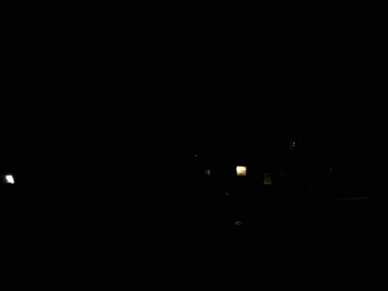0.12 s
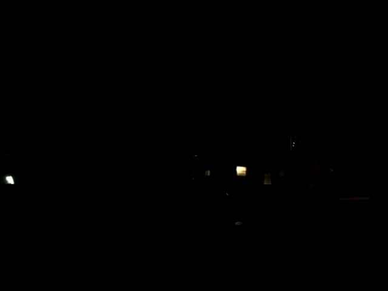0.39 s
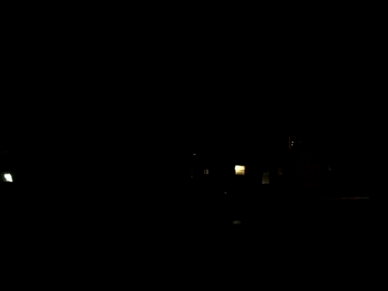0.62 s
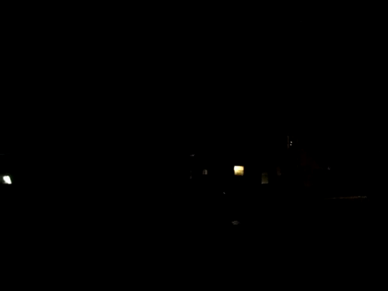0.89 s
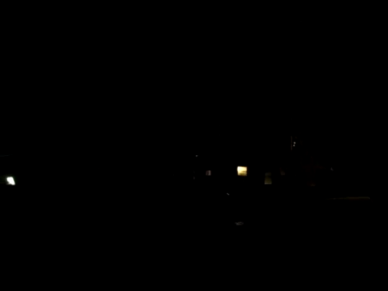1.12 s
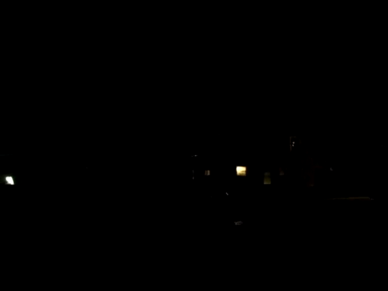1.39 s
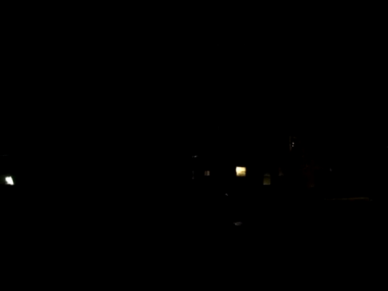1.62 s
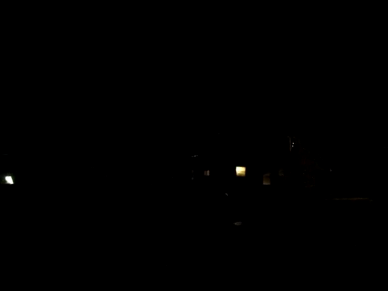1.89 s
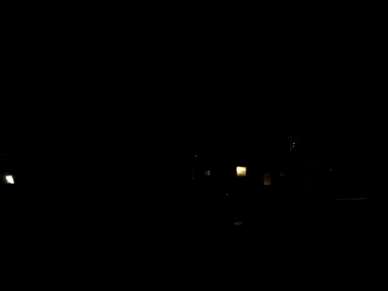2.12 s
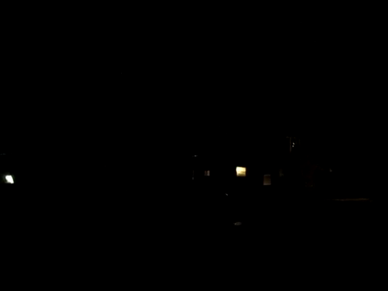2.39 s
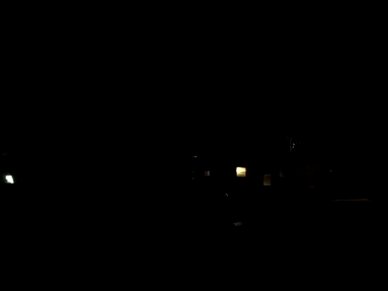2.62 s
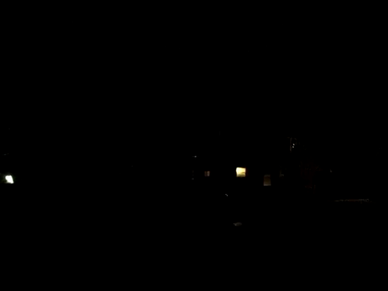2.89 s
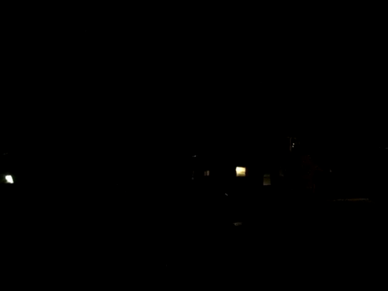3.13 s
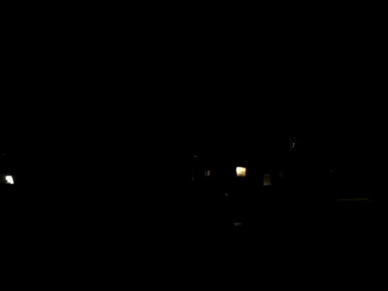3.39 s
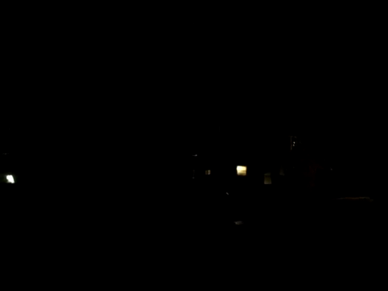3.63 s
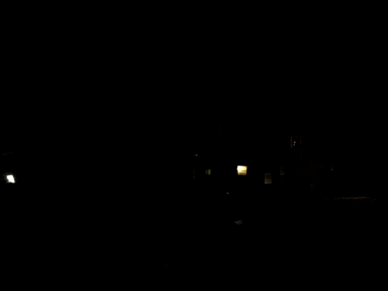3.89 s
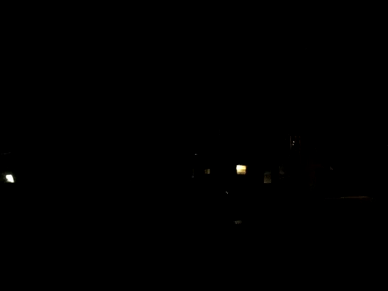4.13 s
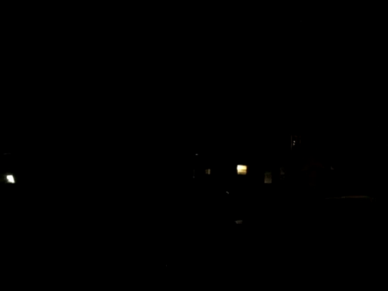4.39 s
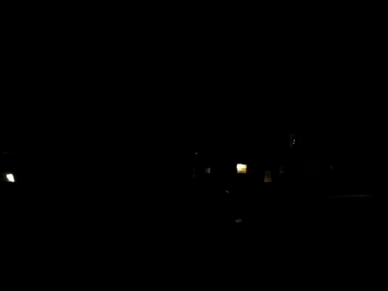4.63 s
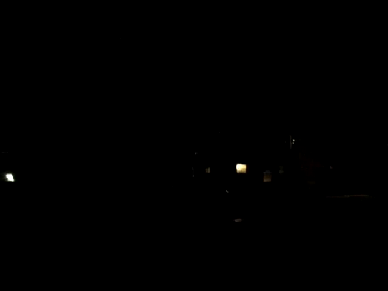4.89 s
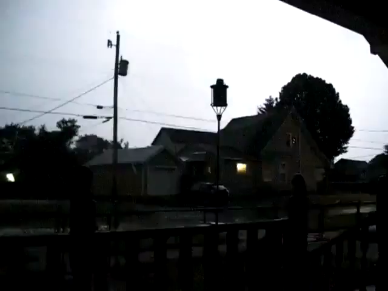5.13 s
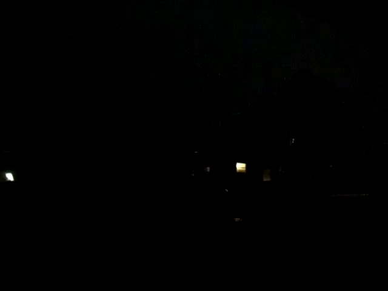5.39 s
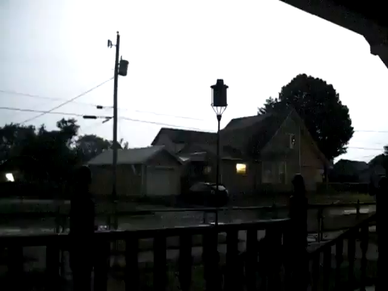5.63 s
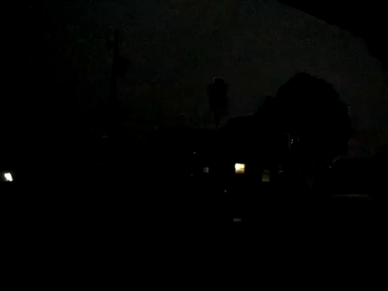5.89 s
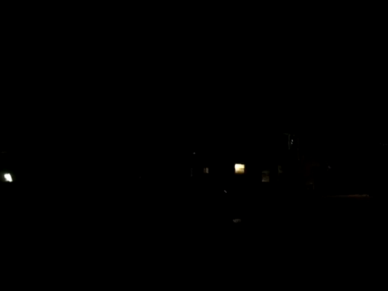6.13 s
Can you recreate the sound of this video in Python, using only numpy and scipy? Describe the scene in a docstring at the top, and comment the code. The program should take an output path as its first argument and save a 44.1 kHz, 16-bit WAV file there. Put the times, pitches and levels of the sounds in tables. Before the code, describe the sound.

From a porch at night, one microphone picks up soft rain hiss, scattered drop splashes and thin wavering tones. A distant rumble gives way to dull, knocking thunder, peal upon peal, growing to a massive low crash a little past halfway. The automatic gain sinks under the blow, making the rain fade and creep back, while the thunder decays unevenly through lesser rumbles to the end.

```python
"""A porch at night: thunder rolls over steady rain on the street.
Crowds of low shocks, made from filtered impulses and noise, swell in peals; single booms are short sine bursts.
Rain is patchy coloured noise with a patter of impulses; near drops splash as short noise sprays.
A few faint whines, wavering sines, hang in the rain.
The loudest booms pull the recorder's gain down, so rain and whines sink and creep back."""
import sys
import numpy as np
from scipy import signal
from scipy.fft import rfft, irfft, next_fast_len
from scipy.io import wavfile
from scipy.ndimage import uniform_filter1d, minimum_filter1d, map_coordinates

SR = 44100
rng = np.random.default_rng(int(sys.argv[2]) if len(sys.argv) > 2 else 0)


def transcribe(u):
    """Save the signal u as a 16-bit wav file named by the first command-line argument.

    u: samples, shape (n,) or (channels, n), limited to [-1, 1]; the rate is SR.
    q: integer samples, one column per channel.
    """
    v = np.clip(np.atleast_2d(u).T, -1, 1)
    q = np.round(v * 32767).astype(np.int16)
    wavfile.write(sys.argv[1], SR, q)


def voltage_ratio(level):
    """Linear amplitude factor for a level in decibels (scalar or array-like)."""
    return 10 ** (np.asarray(level, float) / 20)


N = 276507  # samples

# Rain level before gain control. Each row: time in seconds, level in dB.
RAIN_LEVEL = [(0, -44), (2.6, -44), (5.2, -44), (6.27, -42.5)]
# Rain spectrum. Each row: frequency in Hz, relative density in dB.
RAIN_SPECTRUM = [(180, -38), (300, -13.5), (500, -1.5), (770, -5.5), (1200, -7), (1800, -11), (2600, -10),
                 (3600, -14), (5000, -16), (6500, -20.5), (8500, -26.5), (12000, -33), (15000, -66)]
# Whines. Each row: frequency in Hz, base level in dB against the rain level, wavering in dB, phase drift in rad.
WHINES = [(1533, -9, 1, .3), (2888, -12.5, 3, .5), (2830, -19, 2, .5), (7760, -33, 1, .3)]
# Whine swell. Each row: time in seconds, change of the lowest whine in dB, change of the higher ones in dB.
WHINE_SWELL = [(0, 2.5, 5), (1.3, 3, -4), (2.4, 2, -6), (3.6, -1, -9), (4.6, -0.5, -0.5), (5.8, -1.5, 1),
               (6.27, -3, 6)]
# Near splashes. Each row: start in seconds, nominal peak in dB, centre in Hz, nominal length in seconds.
SPLASHES = [(0.255, -50.5, 6950, .012), (.53, -40, 4500, .2), (1.213, -42, 5000, .05),
            (1.478, -32.5, 3480, 0.024), (1.615, -44.5, 6500, 0.023), (1.914, -37, 3500, 0.015),
            (2.297, -35.5, 10000, 0.0033), (2.303, -45, 10100, .025), (2.67, -46.5, 6000, .04),
            (3.577, -40.5, 4480, 0.018), (4.53, -44, 10000, .01), (5.509, -46.5, 7000, .01),
            (5.889, -44, 5000, .03), (6.171, -43, 5000, 0.007), (6.204, -41, 10000, .012)]
# Peals. Each row: time of the top in seconds, body level in dB, rise in seconds per 10 dB,
# fall in seconds per 10 dB, depth in dB (added to the deep range, taken from the bright one).
PEALS = [(.45, -39, 0.66, 0.78, -6.5), (.82, -37.5, .06, 0.087, -12), (1.38, -25.5, 0.13, 0.19, -1.5),
         (1.53, -22, 0.11, 0.14, 3), (1.69, -23.5, 0.048, 0.11, 0.5), (1.81, -18, 0.035, .25, -3.5),
         (2.03, -20.5, 0.036, 0.24, 0), (2.33, -21, 0.092, 0.72, 1), (2.711, -16.5, .12, 0.15, -0.5),
         (3.1, -19, 0.38, 0.34, -2.5), (3.48, -16, 0.22, 0.14, 0), (3.62, -11, 0.074, 0.22, 2),
         (3.83, -10, .12, 0.27, 3.5), (4.25, -19.5, 0.24, 0.37, 1), (4.54, -17.5, 0.21, 0.32, 3),
         (5.02, -21.5, 0.49, 0.59, 3.5), (5.48, -19, 0.25, 0.26, 0.5), (5.72, -22.5, 0.21, 0.59, 0),
         (6.25, -26, 0.26, .3, -1)]
# Thunder spectrum. Each row: frequency in Hz, relative density in dB.
THUNDER_SPECTRUM = [(15, -53), (24, -28.5), (33, -20), (43, -25.5), (50, -14.5), (62, -6), (84, -2.5),
                    (123, -1), (225, -2.5), (292, -8), (361, -14), (462, -14.5), (707, -23), (850, -30),
                    (1100, -36), (1500, -72)]
# Single booms. Each row: time of the top in seconds, peak before gain control in dB, pitch in Hz,
# nominal width in seconds.
BOOMS = [(1.354, -13.5, 205, 0.024), (1.547, -13.5, 192, 0.042), (1.685, -9.5, 211, 0.018),
         (1.83, -11, 188, 0.034), (1.857, -11, 186, 0.043), (2.013, -8, 188, 0.036),
         (2.315, -7.5, 133, 0.024), (2.708, -9, 149, .015), (2.719, -3, 185, 0.018),
         (2.821, -11.5, 193, .017), (3.006, -11, 111, 0.012), (3.077, -11.5, 150, .025),
         (3.222, -9.5, 205, .018), (3.343, -9, 212, 0.031), (3.465, -10.5, 138, 0.023),
         (3.498, -3.5, 220, 0.014), (3.584, -5.5, 130, .017), (3.632, -1, 202, .015),
         (3.66, -1, 237, 0.044), (3.783, 6.5, 125.5, 0.021), (3.82, 1.3, 83, 0.025), (3.889, 2.5, 88, .028),
         (3.995, -4, 140, 0.017), (4.256, -10.5, 100, 0.028), (4.544, -9.5, 178, 0.024),
         (5.025, -14, 111, 0.016), (5.464, -11, 156, 0.027), (5.554, -14, 190, 0.0286),
         (5.634, -13.5, 166, 0.022), (5.703, -14.5, 97, .025)]

MURMUR_DB = -41.5  # far thunder that never stops
DEEP_DB, BRIGHT_DB = -7.5, -8.5  # against the body range
HOLD_DB, LISTEN_S, RETURN_DB_PER_S = -5, 0.012, 4.5  # gain control


def unit(x):
    """Scales x to an rms of 1."""
    return x / np.sqrt(np.mean(x ** 2) + 1e-20)


def curves(rows):
    """One value per sample for each column after the time."""
    s, *columns = np.transpose(rows)
    return [np.interp(np.arange(N) / SR, s, column) for column in columns]


def wobble(knots_per_s):
    """A smooth random curve."""
    knots = rng.standard_normal(int(N * knots_per_s / SR) + 4)
    return map_coordinates(knots, [np.arange(N) * knots_per_s / SR])


def coloured(x, spectrum, share=lambda hz: 1):
    """x through a (Hz, dB) spectrum, or through the part of it that share keeps."""
    size = next_fast_len(len(x) + 8192)
    hz = np.fft.rfftfreq(size, 1 / SR) + 1e-3
    point_hz, point_db = np.transpose(spectrum)
    gain_db = np.interp(np.log(hz), np.log(point_hz), point_db)
    return irfft(rfft(x, size) * voltage_ratio(gain_db) * share(hz), size)[:len(x)]


def pelting(per_second, spread_db):
    """Impulses at random moments, either sign, some larger than the rest."""
    moment, sign, rank = rng.random((int(per_second * N / SR), 3)).T
    size = np.sign(sign - 0.5) * voltage_ratio(-spread_db * np.log(1.003 - rank))
    return np.bincount((moment * N).astype(int), size, N)


def rain_hiss():
    """Far drops merge into a patchy hiss; nearer ones patter on top."""
    z = signal.stft(rng.standard_normal(N), nperseg=512)[2]
    patches = uniform_filter1d(rng.standard_normal(z.shape), 30, axis=0)
    patches = uniform_filter1d(patches, 8, axis=1)
    far = signal.istft(z * voltage_ratio(0.58 * unit(patches)), nperseg=512)[1][:N]
    near = unit(pelting(per_second=500, spread_db=3.0))
    drops = unit(far) + voltage_ratio(-12.5) * near
    return unit(coloured(drops, RAIN_SPECTRUM)) * voltage_ratio(0.58 * wobble(9))


def whines():
    """Sines that waver in level and drift in phase."""
    t = np.arange(N) / SR
    low_db, high_db = curves(WHINE_SWELL)
    out = np.zeros(N)
    for hz, db, waver_db, drift_rad in WHINES:
        swell_db = low_db if hz < 2000 else high_db
        level_db = db + swell_db + waver_db * wobble(5)
        out += voltage_ratio(level_db) * np.sin(2 * np.pi * hz * t + drift_rad * wobble(8))
    return out


def rain():
    """Hiss and the whines that hang in it follow one level curve."""
    level_db, = curves(RAIN_LEVEL)
    return voltage_ratio(level_db) * (voltage_ratio(3.5) * rain_hiss() + whines())


def splashes():
    """A near drop bursts into a short spray, coloured around its centre."""
    out = np.zeros(N + SR)
    t = np.arange(SR // 4) / SR
    for s, db, hz, length_s in SPLASHES:
        colour = [(hz / 5, -30), (hz / 1.8, -3), (hz, 0), (hz * 1.4, -4), (hz * 2.5, -24), (hz * 5, -60)]
        u = t / (0.27 * length_s)
        spray = unit(coloured(rng.standard_normal(len(t)), colour))
        out[round(s * SR):][:len(t)] += voltage_ratio(db - 5.5) * u * np.exp(1 - u) * spray
    return out[:N]


def peals():
    """Each peal rises, tops and rolls off; their powers add, in the body, deep and bright range."""
    top_s, db, rise_s, fall_s, depth_db = np.transpose(PEALS)[:, :, None]
    t = np.arange(0, N / SR + 0.01, 0.002)
    before, after = np.maximum(top_s - t, 0), np.maximum(t - top_s, 0)
    body_db = db - 10 * (before / np.abs(rise_s) + after / np.abs(fall_s))
    ranges_db = body_db, body_db + depth_db, body_db - depth_db
    swells = []
    for range_db, offset_db in zip(ranges_db, (0, DEEP_DB, BRIGHT_DB)):
        level = np.sqrt(np.sum(voltage_ratio(2 * range_db), axis=0) + voltage_ratio(2 * MURMUR_DB))
        swells.append(voltage_ratio(offset_db) * np.interp(np.arange(N) / SR, t, level))
    return swells


def roll():
    """Each kink of the lightning channel sends a shock; the crowd swells peal by peal."""
    deep = lambda hz: 1 / np.sqrt(1 + (hz / 110) ** 6)
    bright = lambda hz: 1 / np.sqrt(1 + (330 / hz) ** 6)
    body = lambda hz: np.sqrt((1 - deep(hz) ** 2) * (1 - bright(hz) ** 2))
    shocks = unit(pelting(per_second=1500, spread_db=1.6))
    shocks = shocks + 1.46 * rng.standard_normal(N)  # the farthest shocks blur into a roar
    out = np.zeros(N)
    for swell, share in zip(peals(), (body, deep, bright)):
        out += swell * unit(coloured(shocks, THUNDER_SPECTRUM, share))
    return out


def booms():
    """Shocks that arrive in step pile up into a few strong cycles that swell and fade."""
    out = np.zeros(N + SR)
    t = np.arange(-SR // 8, SR // 8) / SR
    for s, db, hz, width_s in BOOMS:
        phase, bend = rng.random(2)
        swell = np.exp(-(t / (width_s * np.where(t < 0, 0.45, 0.6))) ** 2)
        cycles = hz * t * (1 + 3 * (bend - 0.5) * t)
        out[round(s * SR) - SR // 8:][:len(t)] += voltage_ratio(db) * swell * np.sin(2 * np.pi * (cycles + phase))
    return out[:N]


def scene():
    """Thunder, rain and splashes, one channel."""
    return (roll() + booms() + rain() + splashes())[None]


def gain_control(x):
    """Loud thunder pulls the gain down fast; it creeps back at a steady rate."""
    envelope = np.abs(signal.hilbert(x, next_fast_len(N))[..., :N])
    level = uniform_filter1d(envelope, int(LISTEN_S * SR))
    needed_db = np.minimum(0, HOLD_DB - 20 * np.log10(np.abs(level) + 1e-9))
    creep_db = RETURN_DB_PER_S * np.arange(N) / SR
    gain_db = np.minimum(0, creep_db + np.minimum.accumulate(needed_db - creep_db, axis=-1))
    return x * voltage_ratio(uniform_filter1d(gain_db, size=300))


def limiter(x):
    """Looks a little ahead and holds peaks under full scale."""
    needed = np.minimum(1, 0.88 / (np.abs(x) + 1e-9))
    return x * uniform_filter1d(minimum_filter1d(needed, size=1300), size=600)


def roll_off(x):
    """The treble ends steeply here."""
    return signal.sosfilt(signal.butter(12, 11930, fs=SR, output="sos"), x)


def record(dry):
    """The recorder: gain control, then the limiter."""
    mix = limiter(gain_control(dry))
    return roll_off(mix)


dry = scene()
out = record(dry)
transcribe(out)
```